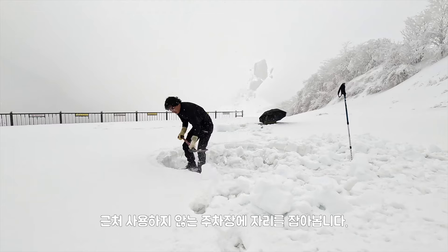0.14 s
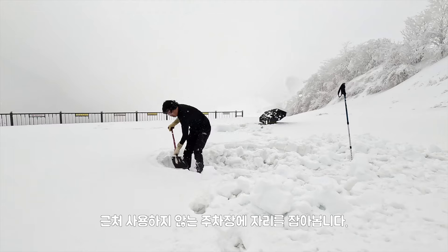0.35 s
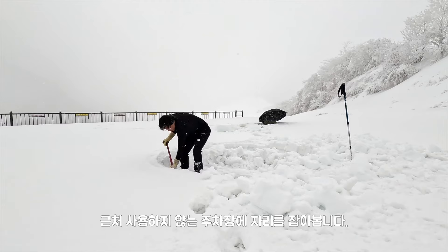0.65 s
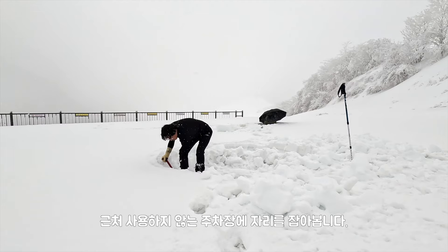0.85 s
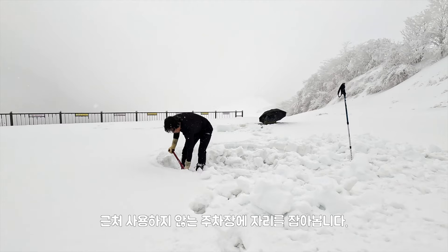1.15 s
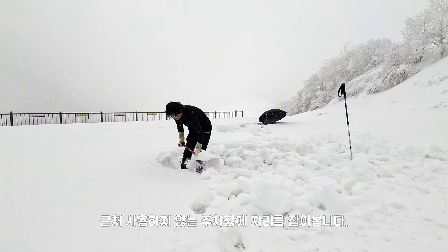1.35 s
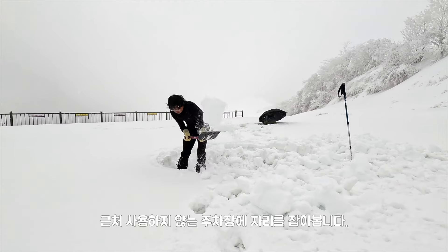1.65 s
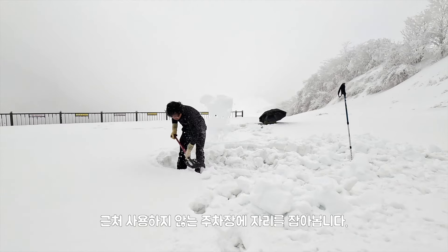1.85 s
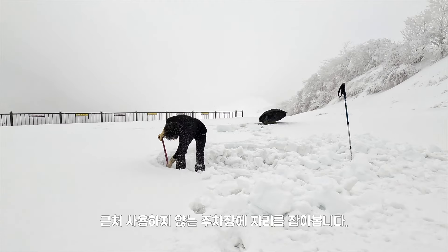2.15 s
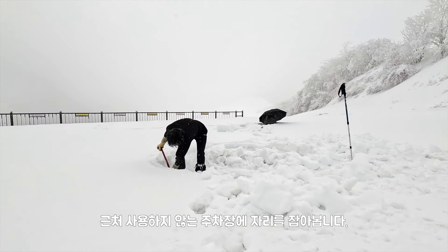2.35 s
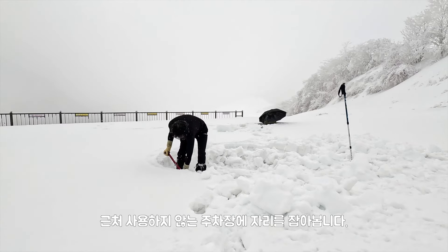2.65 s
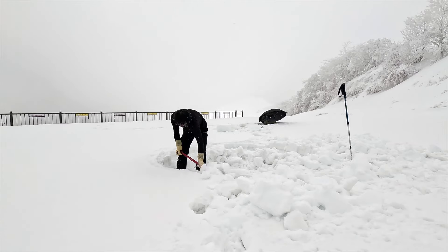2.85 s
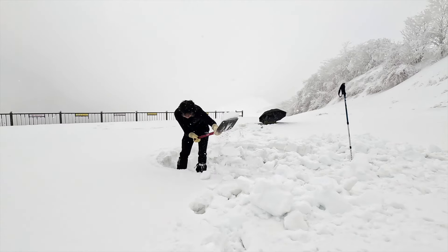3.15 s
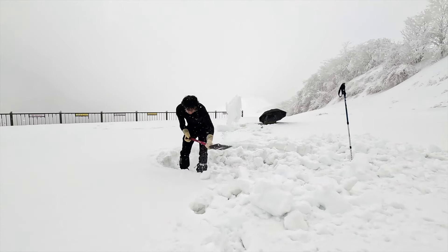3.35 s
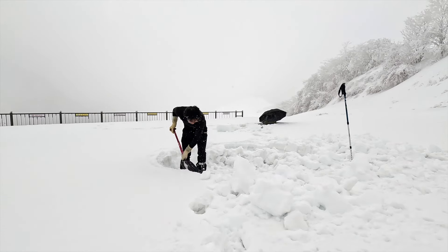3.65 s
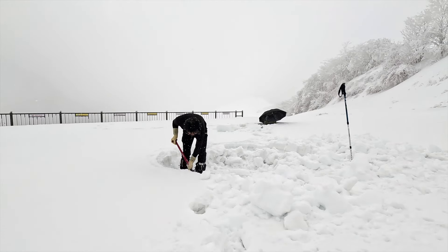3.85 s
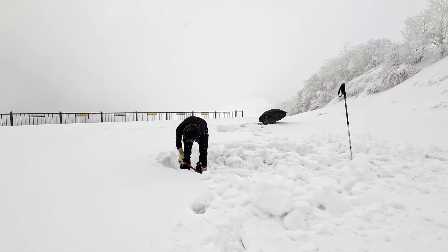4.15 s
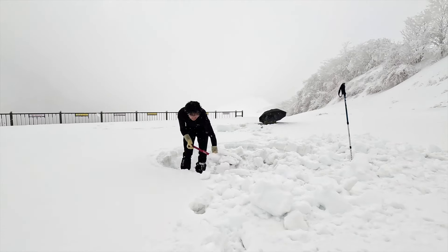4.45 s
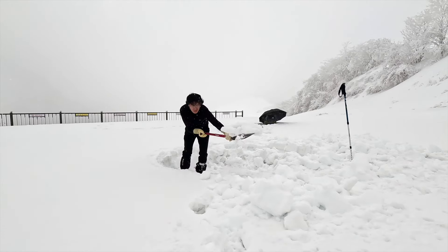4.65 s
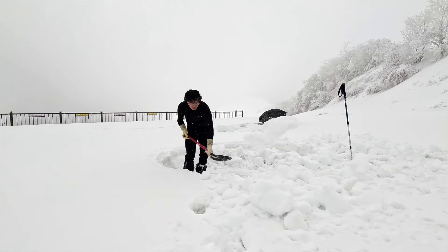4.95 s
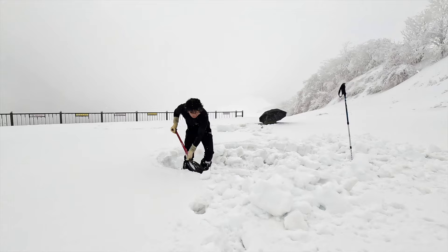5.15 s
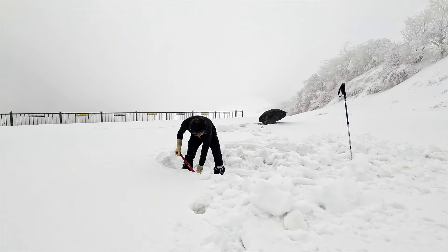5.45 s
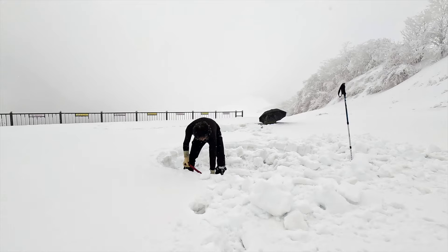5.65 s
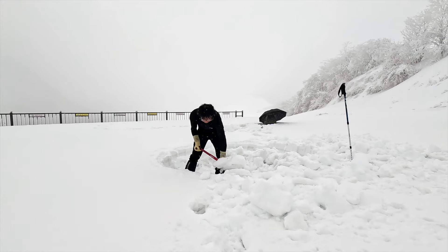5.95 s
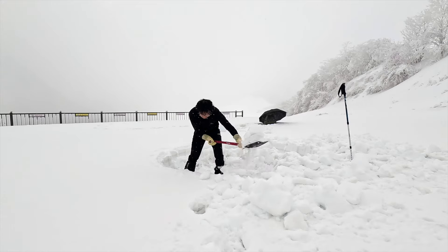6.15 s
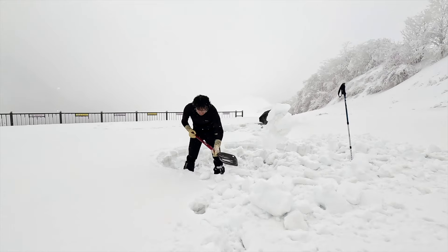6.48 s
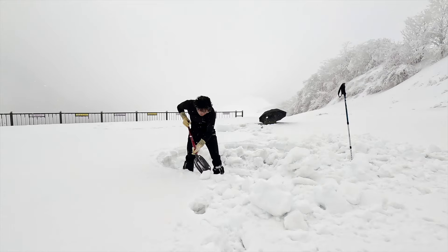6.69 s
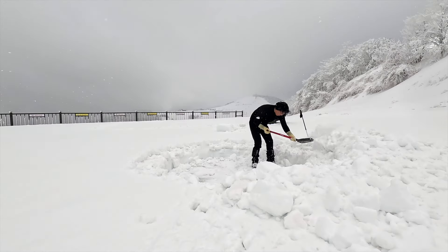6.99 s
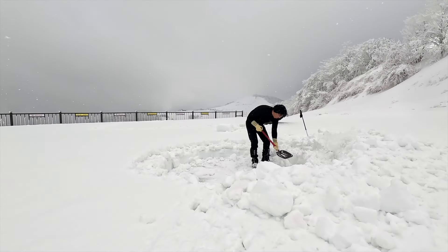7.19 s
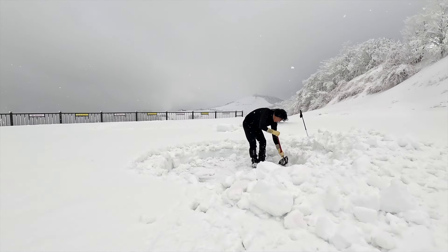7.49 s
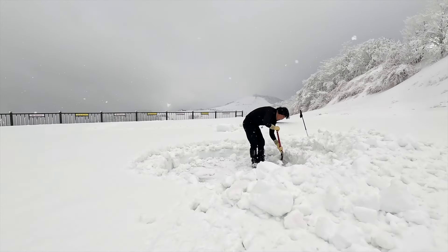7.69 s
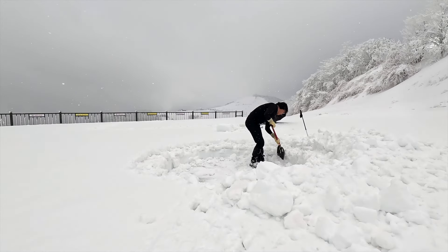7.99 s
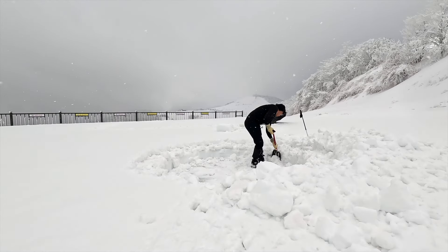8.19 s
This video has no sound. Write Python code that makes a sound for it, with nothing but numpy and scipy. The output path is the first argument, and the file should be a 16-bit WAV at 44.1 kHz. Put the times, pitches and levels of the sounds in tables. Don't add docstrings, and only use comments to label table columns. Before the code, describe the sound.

A metal shovel crunches and scrapes through crusty snow in an open windy field, lumps thudding in the scoop, with gusts buffeting the microphone.

```python
import sys
import numpy as np
from scipy import signal
from scipy.fft import rfft, irfft, next_fast_len
from scipy.io import wavfile
from scipy.ndimage import uniform_filter1d

SR = 44100
rng = np.random.default_rng(int(sys.argv[2]) if len(sys.argv) > 2 else 0)


def decibels_to_gain(level_db):
    exponent = np.asarray(level_db, float) / 20
    return 10 ** exponent


def unload_audio(sound):
    columns = np.transpose(np.atleast_2d(sound))
    steps = np.round(np.clip(columns, -1, 1) * 32767)
    wavfile.write(sys.argv[1], SR, steps.astype(np.int16))


N = 367073
SCENE_CHANGE_S = 6.7548


def evened(x):
    return x / np.sqrt(np.mean(x ** 2) + 1e-20)


def read(points, hz):
    f, value = np.transpose(points)
    return np.interp(np.log(hz + 1), np.log(f + 1), value)


def add(mix, s, sound):
    part = mix[..., round(s * SR):][..., :sound.shape[-1]]
    part += sound[..., :part.shape[-1]]


def coloured(x, points):
    size = next_fast_len(x.shape[-1])
    gain = decibels_to_gain(read(points, np.fft.rfftfreq(size, 1 / SR)))
    return irfft(rfft(x, size) * evened(gain), size)[..., :x.shape[-1]]


def lumps(hz):
    return evened(coloured(rng.standard_normal(N), [(0, 0), (hz, 0), (3 * hz, -60)]))


def spread_out(a, b, same):
    angle = np.arccos(np.clip(same, 0, 1)) / 2
    return np.array([np.cos(angle) * a + side * np.sin(angle) * b for side in (1, -1)])


def pair(points, same):
    a, b = coloured(rng.standard_normal((2, N)), points)
    return spread_out(a, b, same)


def swells(s, db, spread):
    now = np.arange(0, N + 64, 64) / SR
    distance = abs(now - s[:, None]) / np.clip(spread, .03, 1)[:, None]
    humps = decibels_to_gain(db[:, None] - 10 * distance ** 1.28)
    return np.interp(np.arange(N) / SR, now, humps.sum(0))


# (frequency [Hz], level [dB per Hz])
HISS = [(410, -41), (700, 24), (872, -69), (1210, 22), (3960, 5.5), (7190, 2), (12100, -18), (15400, -49)]


def field_hiss():
    return decibels_to_gain(-79.5 + 1.5 * lumps(11.0)) * pair(HISS, same=0.26)


# (peak time [s], buffet level [dB], spread [s], flutter above buffet [dB])
GUSTS = [(0.0, -37, 0.23, -13), (0.371, -50, 0.021, 8), (0.62, -44.5, 0.064, 7.5), (0.9, -40.5, 0.2, -10),
         (1.38, -46.5, 0.16, -2.5), (2.0, -47, 0.2, -1.5), (2.29, -39.5, 0.089, 1.5), (2.55, -52, .05, 6),
         (2.9, -45.5, 0.19, -6.5), (3.84, -51.5, 0.054, 4.5), (4.75, -45, 0.076, -4),
         (4.94, -41.5, 0.16, -2.5), (5.33, -40, 0.097, 2), (5.7, -45, 0.18, -6.5), (5.96, -39.5, 0.07, 1),
         (6.27, -41.5, 0.089, -2), (6.5, -38, 0.042, 0), (6.812, -41, 0.14, -7.5),
         (7.07, -45.5, 0.093, -1.5), (7.333, -34, 0.13, -9), (7.646, -30.5, 0.067, -7.5),
         (7.9, -40, 0.17, -4), (8.169, -35.5, 0.14, -2.5)]
CALM_DB = -53.5


def flutter_strength():
    s, db, spread, flutter_db = np.transpose(GUSTS)
    return decibels_to_gain(CALM_DB - 15.5) + swells(s, db + flutter_db, spread)


# (peak time [s], level [dB], spread [s], upper edge [dB])
SWELLS = [(0.2, -61, 0.27, -9), (0.79, -51, 0.27, -17), (1.38, -49.5, 0.094, -3), (1.93, -50.5, 0.17, -10),
          (2.45, -46, 0.18, -23), (2.97, -50.5, 0.16, -9), (3.47, -47, 0.19, -4), (4.15, -50, 0.29, -15.5),
          (4.65, -48.5, 0.13, -7), (5.1, -48, 0.34, -4.5), (5.9, -49.5, 0.35, -4.5),
          (6.3, -42, 0.085, -7.5), (6.73, -49.5, 0.37, -8.5)]
# (frequency [Hz], level [dB])
ROAR_LOW = [(110, -40), (160, -2), (200, 3.5), (280, -1), (340, -10.5), (420, -73)]
# (frequency [Hz], level [dB])
ROAR_TOP = [(260, -3.5), (340, 0.5), (450, -5), (550, -13), (700, -30), (900, -75)]
# (frequency [Hz], level [dB])
GUST_TOP = [(70, -18), (110, -1.5), (200, -2.5), (300, -14.5), (450, -31.5), (700, -61)]


def roar():
    lull = decibels_to_gain(-69.5)
    s, db, spread, top_db = np.transpose(SWELLS)
    far = (lull + swells(s, db, spread)) * pair(ROAR_LOW, same=0.99)
    far += (lull + swells(s, db + top_db, spread)) * pair(ROAR_TOP, same=0.92)
    near = decibels_to_gain(-51) * (flutter_strength() * decibels_to_gain(43.0)) ** 2.5 * pair(GUST_TOP, same=0.085)
    unsteady = decibels_to_gain(1.77 * lumps(18.0) + 1.0 * lumps(8.9))
    return unsteady * np.where(np.arange(N) < SCENE_CHANGE_S * SR, far, near)


# (frequency [Hz], level [dB])
BUFFET = [(8, 8), (18, 9), (35, 10.5), (60, -1), (90, -14.5), (140, -64.5)]
# (frequency [Hz], level [dB])
FLUTTER = [(40, -9.5), (65, 6.5), (100, -1), (140, -5), (220, -25.5), (500, -66)]
# (time [s], left height [full scale], right height [full scale], width [ms])
SLAPS = [(0.608, 0.027, 0.053, 8.1), (0.629, -0.03, -0.039, 6.9), (0.889, -0.017, -0.045, 6.4),
         (4.89, -0.015, -0.023, 2.4), (4.929, 0.0067, 0.018, 6), (4.961, 0.013, 0.032, 9.5),
         (5.957, 0.041, 0.074, 5.3), (6.499, 0.017, 0.037, 4.4), (7.305, 0.00036, -0.00086, 9.5),
         (7.589, 0.022, 0.0084, 5), (7.63, -0.038, 0.0024, 9.1), (7.661, -0.07, -0.025, 14),
         (7.711, -0.018, -0.012, 8.7), (7.979, 0.039, 0.056, 4.9), (8.074, 0.0021, 0.019, 3.4),
         (8.166, 0.037, -0.0081, 3)]


def wind():
    strength = decibels_to_gain(CALM_DB) + swells(*np.transpose(GUSTS)[:3])
    gusty_db = 2.44 * lumps(16.0)
    out = strength * decibels_to_gain(1.5 + gusty_db) * pair(BUFFET, same=0.64) * decibels_to_gain([[-1.2], [1.2]])
    flutter_db = -2.5 + gusty_db + 2.4 * lumps(14)
    out += flutter_strength() * decibels_to_gain(flutter_db) * pair(FLUTTER, same=.5)
    t = np.arange(-2000, 2000) / SR
    for s, left, right, ms in SLAPS:
        u = t * 1560 / np.clip(ms, 4, 20)
        slap = (1 - .5 * u - u ** 2) * np.exp(-u ** 2 / 2)
        add(out, s + t[0], 1.71 * np.outer([left, right], slap))
    return out


# (time [s], left minus right [dB])
DIGGER_PAN = [(0, -1.5), (3.5, -0.5), (4.7, -2.5), (5.6, -2), (6.3, -3), (8.32, -4.5)]


def digger_pan():
    s, db = np.transpose(DIGGER_PAN)
    return decibels_to_gain(np.outer([.5, -.5], np.interp(np.arange(N) / SR, s, db)))


# (frequency [Hz], likeness [0-1])
SAME = [(400, 0.98), (700, 0.8), (1300, 1), (2400, 0.87), (4400, 0.9), (8100, .95), (11000, 0.92),
        (13000, 0.14)]
# (frequency [Hz], left minus right [dB])
TILT = [(400, -0.5), (1300, 0), (4400, 0.5), (8000, 1.5), (13000, 7)]


def at_both_sides(x, clumps_db):
    hz, _, (a, b) = signal.stft(x, SR, nperseg=256)
    patches = uniform_filter1d(rng.standard_normal(a.shape), 3, 0)
    patches = evened(uniform_filter1d(patches, 14, 1))
    tilt = decibels_to_gain(read(TILT, hz) / 2)[:, None]
    z = spread_out(a, b, read(SAME, hz)[:, None]) * np.array([tilt, 1 / tilt])
    return digger_pan() * signal.istft(z * decibels_to_gain(clumps_db * patches), SR, nperseg=256)[1][:, :N]


# (start [s], length [s], pitch [Hz], width [Hz], level [dB])
STREAKS = [(1.616, .1, 1730, 110, -54), (1.612, 0.092, 2470, 130, -54), (1.69, 0.051, 2500, 25, -59),
           (1.618, 0.095, 3560, 300, -51), (1.62, 0.085, 3920, 110, -54), (1.645, 0.05, 2160, 110, -53),
           (1.665, 0.055, 5180, 80, -56), (1.7, 0.035, 3450, 50, -61), (1.618, 0.076, 6820, 200, -52.5),
           (2.142, .04, 2220, 60, -53), (2.183, 0.026, 2480, 500, -48), (2.322, 0.038, 2264, 250, -39.5),
           (2.601, 0.055, 1505, 400, -57.5), (2.675, .015, 3500, 200, -49), (2.79, 0.016, 2604, 600, -43),
           (2.821, 0.054, 2890, 500, -52), (2.922, 0.081, 2790, 400, -56.5),
           (3.726, 0.024, 3220, 60, -35.5), (3.728, 0.055, 1700, 40, -49), (3.929, 0.017, 2165, 200, -34),
           (3.995, 0.036, 1422, 302, -37), (4.038, .05, 1296, 300, -46.5), (4.7, .05, 3520, 119, -45),
           (4.756, 0.057, 3400, 120, -46.5), (4.795, 0.044, 3600, 50, -61), (4.7, 0.13, 2260, 100, -58),
           (4.706, 0.019, 1850, 100, -43.5), (4.772, 0.052, 2840, 60, -51.5),
           (4.741, 0.011, 1320, 200, -46), (5.47, 0.039, 2280, 250, -57), (5.531, 0.079, 2250, 120, -54.5),
           (5.613, .025, 3250, 400, -50), (5.675, 0.04, 3030, 200, -59), (7.619, 0.011, 1608, 400, -38),
           (7.985, .008, 3570, 600, -51), (8.004, 0.021, 2755, 200, -45.5), (8.003, 0.021, 4910, 400, -46),
           (8.094, 0.045, 4600, 250, -46), (8.103, 0.055, 1596, 250, -48.5), (8.18, 0.05, 2760, 150, -52)]
# (start [s], length [s], pitch [Hz], width [Hz], level [dB])
THUDS = [(2.186, .02, 610, 250, -55.5), (2.322, 0.027, 481, 250, -42.5), (2.336, 0.032, 564, 250, -45),
         (2.515, 0.032, 650, 350, -50.5), (2.548, 0.017, 686, 300, -51), (2.674, 0.016, 614, 250, -53.5),
         (2.699, 0.016, 523, 200, -60), (2.763, 0.025, 604, 300, -55), (2.79, 0.023, 886, 200, -49),
         (2.814, 0.069, 752, 400, -54.5), (3.201, .02, 594, 200, -63), (3.199, 0.016, 875, 150, -67),
         (4.049, 0.018, 560, 250, -48), (4.104, 0.028, 490, 250, -46.5), (4.678, 0.013, 680, 200, -55),
         (4.699, 0.069, 696, 300, -60.5), (4.794, 0.022, 960, 200, -52), (5.626, 0.071, 664, 250, -63),
         (0.485, 0.0078, 1386, 487, -61), (0.114, 0.0073, 1840, 650, -53), (0.6, 0.079, 1070, 200, -71),
         (8.248, 0.087, 961, 150, -54), (3.729, 0.016, 695, 300, -49.5)]
# (start [s], length [s], pitch [Hz], width [Hz], level [dB])
MORE_STREAKS = [(3.72, 0.016, 2110, 610, -30), (0.29, 0.015, 3300, 200, -61), (.735, 0.078, 2150, 330, -54.5),
                (0.85, 0.17, 3200, 1200, -59.5), (6.285, .055, 3590, 160, -52), (6.292, 0.022, 1720, 100, -51),
                (6.927, .11, 1700, 80, -62), (8.245, 0.037, 2700, 320, -41.5), (3.5, 0.021, 2650, 500, -53.5),
                (6.318, 0.038, 5100, 700, -52), (8.248, .065, 1930, 300, -43), (.7, 0.063, 3700, 400, -57),
                (6.39, 0.022, 2520, 150, -57), (7.57, .007, 2400, 1000, -42.5), (2.3, 0.013, 2800, 840, -49),
                (6.335, .045, 2230, 130, -56), (6.385, 0.049, 3550, 250, -55), (6.385, 0.043, 4900, 770, -56),
                (8.159, .014, 2600, 700, -46), (3.278, .018, 3500, 500, -56)]


def streaks():
    out = np.zeros((2, N))
    for s, length, hz, width, db in STREAKS + THUDS + MORE_STREAKS:
        t = np.arange(0, length, 1 / SR)
        noise = rng.standard_normal((2, 10000, 2)) @ [1, 1j]
        r = np.exp(-np.pi * np.clip(width, 15, 900) / SR)
        noise = signal.lfilter([1], [1, -2 * r, r * r], noise)[:, 2000:][:, :len(t)]
        shared, differing = (noise * np.exp(2j * np.pi * hz * t)).real
        bowed = evened(shared) + 0.17 * evened(differing) * np.array([[1], [-1]])
        add(out, s, decibels_to_gain(db) * bowed * np.sqrt(np.sin(np.pi * (t / length) ** 0.5)))
    return out * digger_pan()


def cracks(size):
    cracks_per_s, spread_db = 6000, 1
    height = decibels_to_gain(spread_db * np.minimum(rng.exponential(1, size), 5))
    height = height * (rng.random(size) < cracks_per_s / SR)
    return evened(height * rng.standard_normal((2, size)))


# (frequency [Hz], level [dB], time to fall 60 dB [s])
BLADE = [(1160, -14, .07), (1490, -9, .06), (1690, -9, .11), (2210, -5, .07), (2500, -5, .07),
         (2770, -8, .06), (3235, -2, .05), (3550, -3, .05), (4280, -14, .045), (4680, -11, .04),
         (5250, -8, .04), (6800, -11, .03), (7400, -10, .035)]


def ringing(x, damping, spot_hz, reach, uneven=1):
    out = np.zeros(x.shape)
    for hz, db, t60 in BLADE:
        r = 10 ** (-3 * damping / (t60 * SR))
        turn = 2 * np.pi * hz / SR
        near_db = -reach * np.log2(hz / spot_hz) ** 2
        tone = signal.lfilter([np.sin(turn)], [1, -2 * r * np.cos(turn), r * r], x)
        out += decibels_to_gain(uneven * db + near_db) * tone
    return out


# (start [s], end [s], first pitch [Hz], last pitch [Hz], level [dB])
HUMS = [
    (3.265, 3.363, 1690, 1695, -69),
    (3.723, 3.79, 1700, 1690, -61),
    (5.079, 5.229, 1300, 1780, -62.5),
    (7.15, 7.22, 1820, 1920, -67),
]


def hums():
    out = np.zeros((2, N))
    for start, end, first_hz, last_hz, db in HUMS:
        size = round((end - start) * SR)
        slip = abs(last_hz - first_hz) + 20
        waver = coloured(rng.standard_normal((2, size)), [(0, 0), (slip / 2, -6), (slip * 2, -40)])
        waver = waver + 60 / slip
        hum = waver * np.sin(2 * np.pi * np.cumsum(np.linspace(first_hz, last_hz, size)) / SR)
        add(out, start, decibels_to_gain(db) * hum * np.sqrt(np.hanning(size)))
    return out


# (time [s], peak [dB], fine powder [dB], ring [0-1], spot on blade [Hz])
KNOCKS = [
    (0.117, -52, -30, 0.4, 1870),
    (0.485, -57, -25, 0.5, 1380),
    (2.143, -38.5, 9.5, 1, 2280),
    (3.201, -43.5, -13, 0.4, 1450),
    (3.722, -12, -10.5, 0.1, 2840),
    (6.477, -48, -25.5, 0.45, 1200),
    (7.621, -18.5, -19, 0.2, 2482),
]
# (frequency [Hz], level [dB])
CRUNCH = [(700, -127), (1000, -28.5), (1300, -14), (2300, -10), (3600, -7.5), (4800, -16), (6000, -49)]
# (frequency [Hz], level [dB])
POWDER = [(3500, -24.5), (4800, -3.5), (6000, -1.5), (7400, -0.5), (9000, -7.5), (11500, -14), (13800, -5),
          (15200, -73)]
# (frequency [Hz], level [dB])
PACKED = [(250, -41), (400, 11), (650, -10.5), (1100, 2), (1500, -12.5)]


def knocks():
    t, out = np.arange(SR // 4) / SR, np.zeros((2, N))
    rise = np.minimum(t / .003, 1)
    for s, db, powder_db, ring, hz in KNOCKS:
        ms = 12.7 + .15 * db
        burst = rise * np.exp(-(t * 1000 / ms) ** 1.7) * cracks(len(t))
        body = ringing(1. * (t == 0), damping=1., spot_hz=hz, reach=28) * rise
        snow = decibels_to_gain(-13.0) * coloured(burst, CRUNCH)
        snow += decibels_to_gain(powder_db - 6.0) * coloured(burst, POWDER)
        snow += decibels_to_gain(-30.0) * coloured(burst, PACKED)
        add(out, s - .0015, decibels_to_gain(db) * (np.clip(ring, .15, 1) * body / abs(body).max() + snow))
    return out


# (start [s], length [s], force at start [dB], force at end [dB], depth [0-1])
DIGS = [(0.69, 0.067, -49.5, -45, 0.23), (0.765, 0.22, -49, -63, 0.38), (2.15, 0.15, -72, -55, 0),
        (2.25, 0.097, -70, -36, 0.52), (2.35, 0.093, -54, -72, 0.77), (2.525, 0.24, -52, -53.5, 0.55),
        (2.77, 0.085, -48.5, -44, 0.67), (2.87, 0.21, -51.5, -55, 0.44), (3.42, 0.22, -56.5, -62, 0.39),
        (3.735, 0.15, -53.5, -68, 0.26), (3.908, 0.11, -48, -37.5, 0.47), (4.03, .17, -41.5, -56.5, 0.68),
        (5.175, 0.14, -58, -59, 0.43), (5.468, .24, -53, -56, 0.37)]
# (start [s], length [s], force at start [dB], force at end [dB], depth [0-1])
SLIDES = [
    (5.93, 0.15, -64.5, -52, 0.4),
    (6.585, 0.17, -55, -60, 0.08),
    (6.825, 0.077, -54.5, -62.5, 0.42),
    (6.935, 0.11, -48.5, -67.5, 0.37),
    (7.55, 0.16, -49, -53.5, 0.57),
    (7.8, 0.2, -69, -49.5, 0.24),
    (8.03, 0.056, -53, -57.5, 0.17),
]
# (start [s], length [s], force at start [dB], force at end [dB], depth [0-1])
THROWS = [
    (1.6, 0.11, -48.5, -49.5, 0.06),
    (4.685, 0.11, -42.5, -44, 0.43),
    (6.265, 0.083, -51, -48.5, 0.38),
    (6.365, 0.056, -52, -54.5, 0.3),
    (8.085, 0.05, -45, -45.5, 0.26),
    (8.15, 0.11, -46.5, -52.5, 0.54),
    (8.272, 0.059, -39.5, -40, 0.6),
]
# (start [s], length [s], force at start [dB], force at end [dB], depth [0-1])
SHUFFLES = [(0.035, 0.12, -60, -64.5, 0.1), (0.2, 0.05, -73, -74, 0), (.285, 0.075, -61, -76, 0),
            (.38, 0.058, -69.5, -80, 0), (0.58, 0.078, -94, -68, 1), (1.1, 0.31, -88.5, -63.5, 0.52),
            (1.41, .17, -81.5, -57, 0), (1.766, 0.0084, -54.5, -60, 0.35), (1.8, 0.1, -71, -103, 0.06),
            (3.1, 0.13, -71, -59.5, 0.34), (3.275, 0.13, -61.5, -77, 0.27), (3.64, 0.089, -86, -52, 0.7),
            (4.21, 0.078, -71.5, -78, 1), (4.41, 0.04, -64.5, -66, 0.7), (4.475, 0.051, -76, -63.5, 0.16),
            (4.54, 0.13, -96, -54.5, 0.7), (4.82, 0.14, -65, -84, 0.5), (4.87, 0.313, -70, -64, 1),
            (5.3, 0.15, -66, -56, 0.73), (5.7, 0.23, -64.5, -79.5, 0.56), (6.1, 0.17, -63, -66, 0.42),
            (6.43, 0.15, -70.5, -63, 0.56), (6.78, 0.036, -70, -69, .3), (7.13, 0.13, -77, -62, 0.93),
            (7.27, 0.3, -64, -70.5, 0.56), (7.73, 0.13, -52.5, -87, 0.85)]


def strokes():
    drive = decibels_to_gain(-82) * np.array([1, decibels_to_gain(5.5), decibels_to_gain(4.5), 0])[:, None] * np.ones(N)
    kinds = ((DIGS, 0.0192, 0.0227, 3.5, -21, 0), (SLIDES, 0.0349, 0.0194, 0.5, -40, 0),
             (THROWS, 0.03, 0.04, 0, -29, 1), (SHUFFLES, 0.0352, 0.029, 4, -22, 0))
    for rows, rise, fall, powder_db, packed_db, bare in kinds:
        for s, length, first_db, last_db, depth in rows:
            t = np.arange(-rise, length + fall, 1 / SR)
            edge = np.minimum(t / (2 * rise), (length - t) / (2 * fall))
            edge = np.clip(edge + .5, 0, 1)
            force = np.sin(np.pi / 2 * edge) ** 2 * decibels_to_gain(first_db + (last_db - first_db) * t / length)
            shares = [1, decibels_to_gain(powder_db - 16.5 * depth), decibels_to_gain(packed_db + 20.5 * depth), bare]
            add(drive, max(s - rise, 0), np.outer(shares, force))
    return drive


# (time [s], peak [dB], fine powder [dB], length [ms])
BITES = [(2.1843, -26.5, -12, 15), (2.247, -35, -6, 29), (2.3241, -21, -5.5, 20), (2.516, -39, -10.5, 18),
         (2.5522, -26, -36, 5.7), (2.6756, -32.5, -7, 6.8), (2.7906, -29, -9, 15), (3.269, -41, -3.5, 18),
         (3.442, -40.5, 8.5, 20), (3.909, -17.5, -5, 23), (3.9324, -20.5, -5, 15.5), (3.9987, -15, -17, 20),
         (4.796, -27.5, -11, 9.1), (5.032, -48, 6.5, 17), (5.173, -35, -11, 8.9), (5.254, -38.5, -2.5, 14),
         (5.474, -47, 1, 11), (5.6186, -34, -23, 29), (6.057, -37.5, -13, 14), (6.804, -39, -14, 8),
         (7.5687, -29, -31, 2), (8.005, -26, -11, 13.4), (8.019, -25.5, -17, 11.4), (8.0735, -49, -5, 11),
         (8.102, -37, -10, 10), (8.121, -30, -17, 9.8), (3.079, -37, -12, 6.4), (5.68, -30, -24, 3.3),
         (8.16, -41, -25, 23), (8.245, -23.5, -14, 20)]
# (time [s], peak [dB], fine powder [dB])
TICKS = [(0.0295, -37.5, 1), (.6075, -50, -15), (6.481, -43, -25), (0.211, -54, 5.5), (6.346, -46, -14),
         (1.065, -55, 4), (1.1116, -50, 1), (1.141, -43, -6), (3.3123, -36.5, -3), (4.4109, -43, -10),
         (4.556, -45, -24), (5.857, -45, -8), (5.21, -38, -8), (6.078, -35, -10), (6.696, -33.5, -9),
         (7.699, -27.5, -45)]
# (frequency [Hz], level [dB])
HOLLOW = [(550, -70), (950, 23), (1150, -28), (1600, 3)]


def crunching():
    force, fine, deep, bare = strokes()
    empty, packed = bare / force, deep / force
    uneven = decibels_to_gain(-2.02 + 1.55 * lumps(11.4) + 1.13 * lumps(110))
    force, fine, deep = force * uneven, fine * uneven, deep * uneven
    t_ms = np.arange(4000) / SR * 1000
    tick_ms, bite_rise_ms = 6.0, 2.2
    for s, db, bite_powder_db, ms in BITES + [tick + (tick_ms,) for tick in TICKS]:
        shape = np.tanh(t_ms / bite_rise_ms) * np.exp(-(t_ms / np.clip(ms, 2, 50)) ** 2.9)
        add(force, s - .001, decibels_to_gain(db - 18) * shape)
        add(fine, s - .001, decibels_to_gain(db + bite_powder_db - 12.0) * shape)
        add(deep, s - .001, decibels_to_gain(db - 21.0) * packed[round(s * SR) + 400] * shape)
    snaps = cracks(N)
    blade = evened(ringing(snaps, damping=2.5, spot_hz=3000, reach=.5))
    steady, thrown = [ringing(x, damping=1.7, spot_hz=2900, reach=9, uneven=.25)
                      for x in (snaps[:, :SR], force * empty * snaps)]
    song = coloured(.5 * thrown / steady.std(), [(800, -30), (1150, 0)])
    free = .4
    crunch = np.sqrt(1 - free ** 2) * coloured(snaps, CRUNCH) + free * blade
    powder = coloured(0.66 * snaps + 0.78 * cracks(N), POWDER)
    loose = np.where(np.arange(N) < SCENE_CHANGE_S * SR, 1, .4)
    heavy = (1 - empty) * loose * coloured(cracks(N), PACKED) + empty * coloured(snaps, HOLLOW)
    return song + force * (1 - 0.064 * empty) * crunch + fine * powder + deep * heavy


def scene():
    field = field_hiss() + roar() + wind()
    blade = at_both_sides(knocks() + hums(), clumps_db=0.17)
    return field + streaks() + blade + at_both_sides(crunching(), clumps_db=2.3)


def band_limit(x):
    return signal.sosfilt(signal.butter(12, 15580, fs=SR, output="sos"), x)


# (frequency [Hz], level [dB])
MICROPHONE = [(10000, -0.5), (12500, -9), (14300, -23), (15300, -28.5), (16200, -49)]


def record(dry):
    wet = dry.copy()
    for s in (.001, SCENE_CHANGE_S):
        step = -.019 - np.diff(dry)[:, round(s * SR) - 1, None]
        add(wet, s, step * np.exp(-np.arange(2000) / 260))
    size = next_fast_len(N)
    gain = decibels_to_gain(read(MICROPHONE, np.fft.rfftfreq(size, 1 / SR)))
    wet = irfft(rfft(wet, size) * gain, size)[:, :N]
    return band_limit(wet)


dry = scene()
out = record(dry)
unload_audio(out)
```